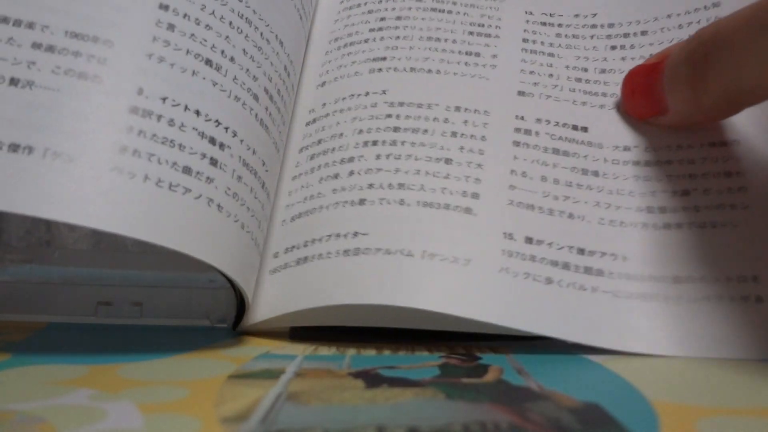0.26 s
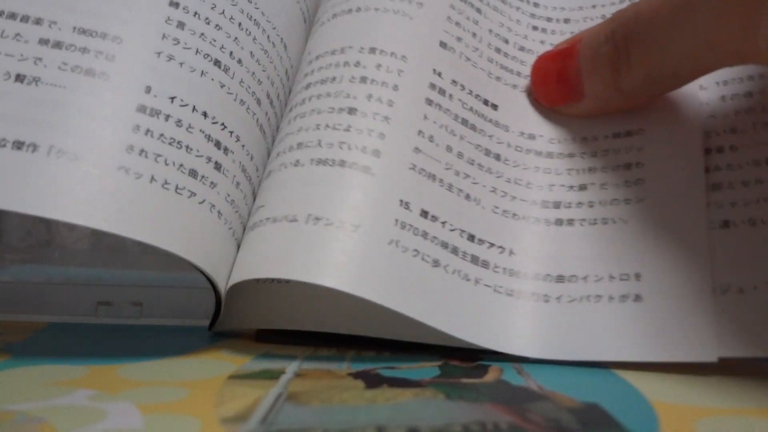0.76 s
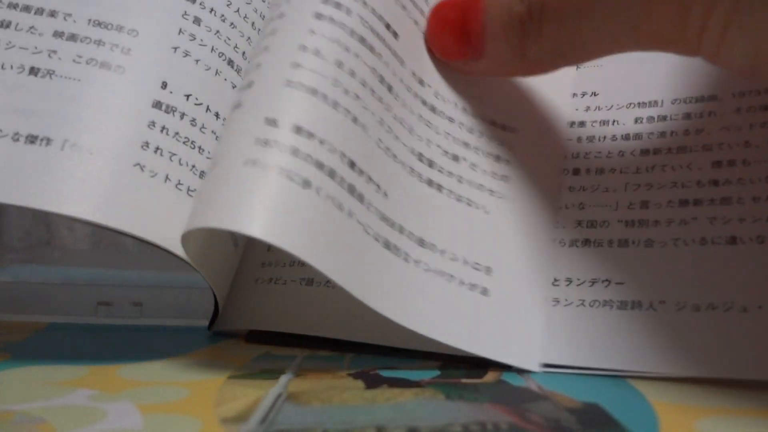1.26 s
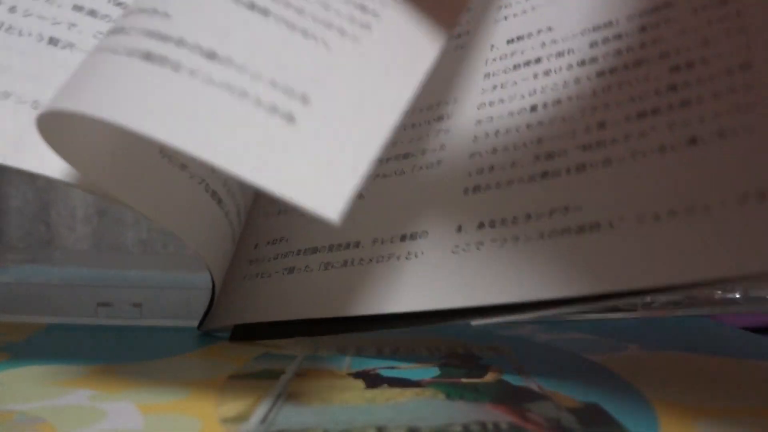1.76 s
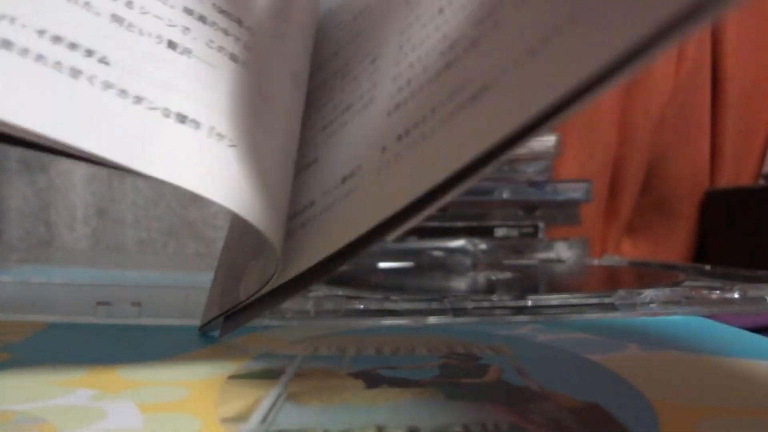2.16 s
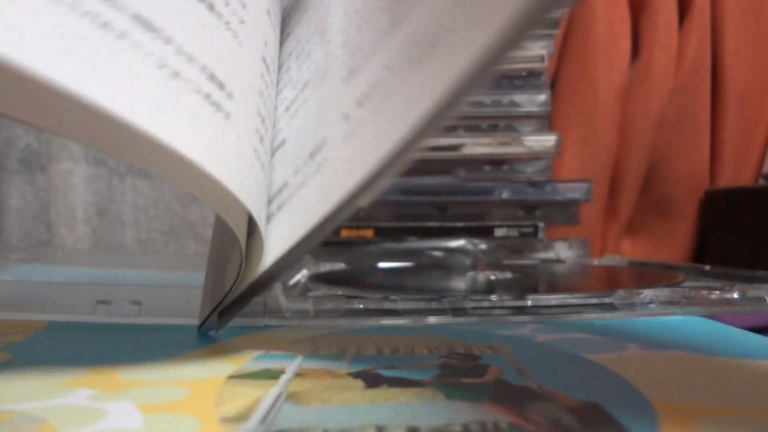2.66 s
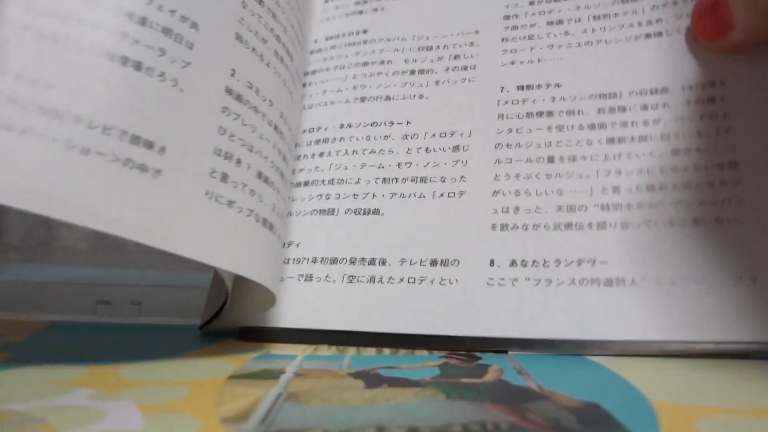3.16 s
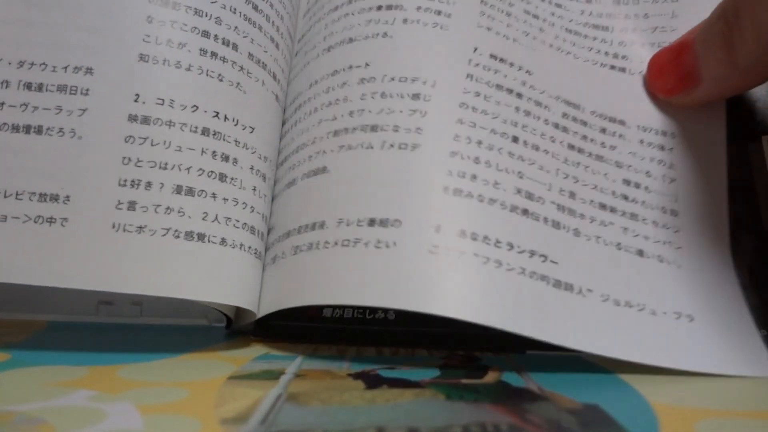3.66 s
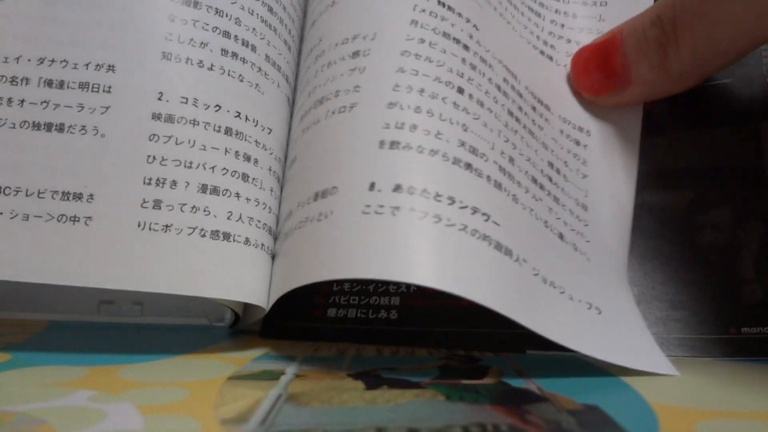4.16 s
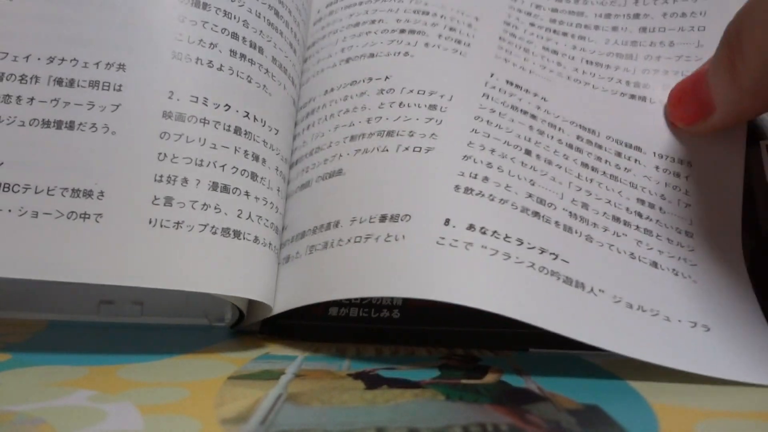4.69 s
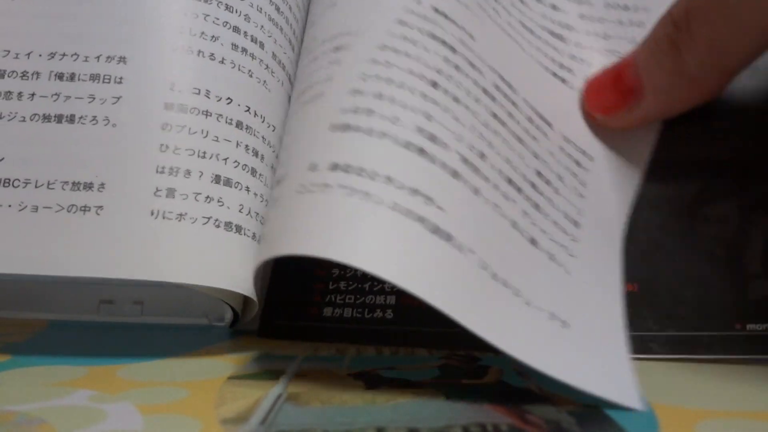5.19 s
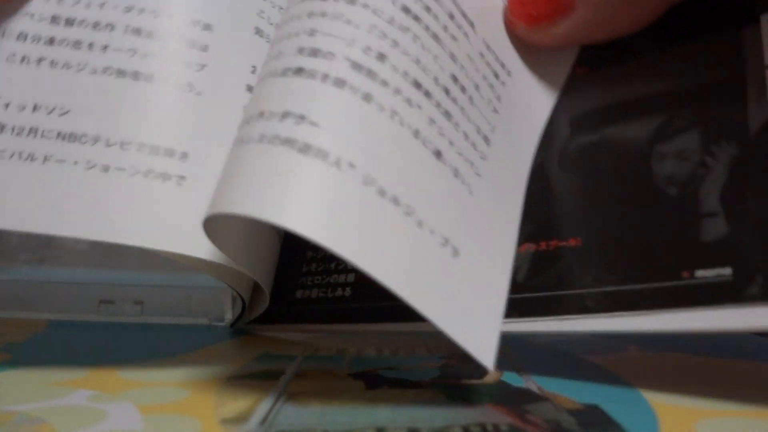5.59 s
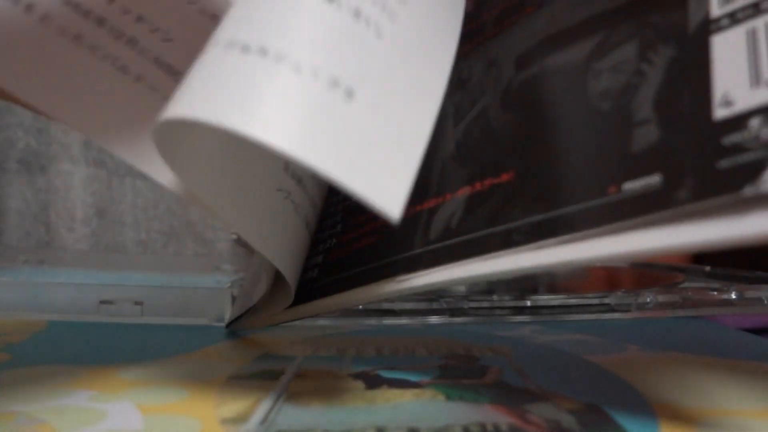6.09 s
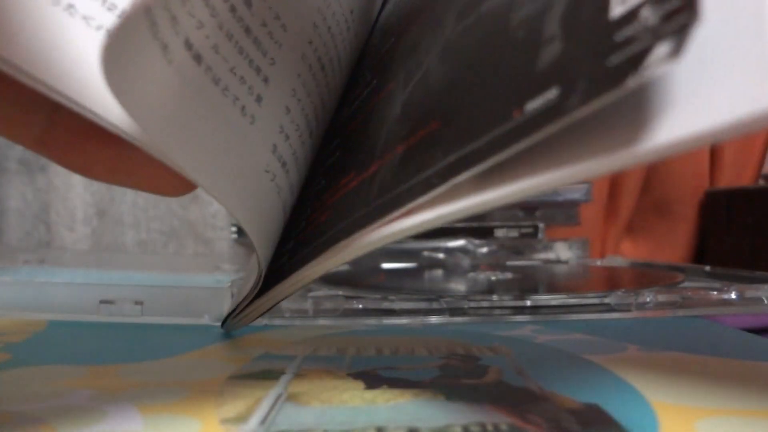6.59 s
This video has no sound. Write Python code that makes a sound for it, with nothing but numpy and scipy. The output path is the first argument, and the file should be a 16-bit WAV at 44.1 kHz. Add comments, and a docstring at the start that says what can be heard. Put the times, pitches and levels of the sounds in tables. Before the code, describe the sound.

Close stereo microphone in a small quiet room: a thumb rubs a thick page in soft, patchy hisses, then the page flips with a cluster of crisp ticks and hollow flutter. After a near-quiet gap come soft bumps, a sharper snap and a longer, stronger rub, ending with a quick bright swish. Faint hum and steady hiss lie underneath.

```python
"""Paper hisses in strokes and short slips as a thumb pushes the stiff pages of a booklet over,
close to a two-port microphone in a quiet room. The rubbing is dense clicks through sheet resonances;
the curl of the page rings hollow in lower ones. Creases tick as short noise bursts through both, and
the booklet bumps on the table as low noise. Short dull echoes, a low rumble, room noise, mains hum
and a thin steady hiss lie below."""
import sys
import numpy as np
from scipy import signal
from scipy.fft import rfft, irfft
from scipy.io import wavfile
from scipy.ndimage import map_coordinates

SR = 44100
rng = np.random.default_rng(int(sys.argv[2]) if len(sys.argv) > 2 else 0)


def waveform_to_disk(signal):
    """Save audio, clipped to [-1, 1], as 16-bit WAV at the path in sys.argv[1]."""
    frames = np.transpose(np.atleast_2d(signal))
    scaled = np.clip(frames, -1, 1) * 32767
    samples = np.round(scaled).astype(np.int16)
    wavfile.write(sys.argv[1], SR, samples)


N = 301644

# resonances of the sheet: (centre [Hz], width before widening [Hz], level before scaling [dB])
SHEET_MODES = [(2943, 535, 0.5), (3363, 945, -1.5), (4035, 720, 2.5), (5630, 850, -0.5), (7180, 790, 1.5),
               (8830, 2650, -1.5), (11050, 19000, -23.5)]
# resonances of the air wedge under the curl: (centre [Hz], width before widening [Hz], level before scaling [dB])
CURL_MODES = [(700, 182, -17.5), (938, 110, -15.5), (1395, 172, 1), (1620, 198, 4), (1755, 280, 3),
              (2540, 230, -3)]
# where the paper sounds: (time [s], left over right [dB])
PLACE = [(0.0, -2), (3.01, 4), (3.37, 0.5), (5.12, -0.5), (6.84, 3)]


def from_db(db):
    """Decibels to an amplitude factor."""
    return 10 ** (np.asarray(db) / 20)


def rms_one(x):
    """Scale to an rms of one."""
    return x / np.sqrt(np.mean(x ** 2) + 1e-20)


def at_times(rows, axis=1):
    """One column of a curve read at every sample."""
    return np.interp(np.arange(N) / SR, np.array(rows)[:, 0], np.array(rows)[:, axis])


def left_right(pan_db):
    """Gains of the two ports that share out a level difference."""
    return from_db([pan_db / 2, -pan_db / 2])


def drift(rate_hz):
    """Slow chance: twice low-passed noise, spread 1."""
    step = 40  # samples between slow values
    pole = np.exp(-2 * np.pi * rate_hz * step / SR)
    noise = rng.standard_normal(N // step + 2002)
    slow = signal.lfilter([1], [1, -2 * pole, pole * pole], noise)[2000:]  # settled part
    return np.interp(np.arange(N) / step, np.arange(len(slow)), rms_one(slow))


def resonate(x, hz, width_hz):
    """Two-pole resonance of gain 1 on top."""
    r = np.exp(-np.pi * width_hz / SR)
    feedback = [1, -2 * r * np.cos(2 * np.pi * hz / SR), r * r]
    return signal.lfilter([(1 - r * r) / 2, 0, (r * r - 1) / 2], feedback, x + 1e-18)


def moving_band(x, hz, width_hz, order):
    """A band whose centre moves: shift down, low-pass, shift back."""
    turn = np.exp(2j * np.pi * np.cumsum(hz) / SR)
    low_pass = signal.butter(order, width_hz / 2, fs=SR, output="sos")
    return (signal.sosfilt(low_pass, x / turn) * turn).real


def gliding(x, hz, width_hz):
    """A resonance that moves in pitch, at an rms of one."""
    return rms_one(moving_band(x, hz, width_hz, order=2))


def friction(per_s, spread_db):
    """Fibres catch and let go: dense clicks of uneven size."""
    sizes = from_db(spread_db * np.minimum(rng.exponential(1, N), 5)) * rng.standard_normal(N)
    return rms_one(sizes * (rng.random(N) < per_s / SR))


def sounding(modes, drive, patchy_db, tilt=0):
    """The bending sheet keeps changing which resonance speaks; steep skirts leave dark valleys."""
    pivot_hz, widening = 5500, 2.28  # tilt is in dB per octave about the pivot
    plain = []
    for k, (hz, width_hz, db) in enumerate(modes):
        once = resonate(drive, hz, widening * width_hz)
        twice = resonate(once, hz, widening * width_hz)
        plain.append((-1) ** k * from_db(db) * twice)
    total = 0
    for mode, (hz, _, _) in zip(plain, modes):
        wander_db = patchy_db * (drift(2.05) + 0.3 * drift(21.6))
        total = total + mode * from_db(wander_db + tilt * np.log2(hz / pivot_hz))
    return total / np.std(sum(plain))


def folded(x):
    """Short echoes off the folds of the page; their paths wander, so dips and peaks shift through the hiss."""
    fold_echo_s = [.00031, .00058, .00107]
    wander_share, fold_db = .05, -13  # wander is a share of each delay
    n, echo_sum = np.arange(N), 0
    for lag_s in fold_echo_s:
        delay = SR * lag_s * (1 + wander_share * drift(2.5))
        echo_sum = echo_sum + map_coordinates(x, [n - delay], order=3)
    return rms_one(x + from_db(fold_db) * echo_sum) * np.std(x)


def catches():
    """Fine ripple in dB: tension builds up slowly, then lets go at once."""
    catches_per_s, build_s, ripple_db = 90, 0.0078, 1.5  # ripple in dB per unit of swell
    marks = rng.exponential(1, N) * (rng.random(N) < catches_per_s / SR)
    # dying tails turned around in time become slow rises with sudden drops
    swell = signal.lfilter([1], [1, -np.exp(-1 / (build_s * SR))], marks + 1e-18)[::-1]
    return ripple_db * (np.minimum(swell, 2) - swell.mean())


def sticking():
    """The stroke sinks and recovers wherever the page sticks for a moment."""
    # page sticks: (centre [s], length [s], deepest drop [dB])
    sticks = [(4.04, 0.067, 6), (4.236, 0.066, 5), (5.165, 0.074, 5), (5.357, 0.061, 8.5),
              (5.634, 0.025, 14), (5.751, 0.012, 21)]
    t, drop_db = np.arange(N) / SR, 0
    for s, length, db in sticks:
        drop_db = drop_db + db * np.clip(1 - (2 * (t - s) / length) ** 2, 0, 1)
    return from_db(-drop_db)


def slips():
    """Power of short slips: each rises quickly to an arch, topped before the middle, and sinks further to its end."""
    # slips between two stickings: (start [s], length [s], hiss level at the top of the arch [dB])
    slip_list = [(0.165, 0.053, -42.5), (0.477, 0.053, -42), (0.772, 0.14, -38.5), (0.906, 0.066, -41),
                 (1.095, 0.055, -41), (1.191, 0.042, -41.5), (1.262, 0.07, -40), (1.325, 0.067, -42.5),
                 (1.39, 0.099, -46), (1.564, 0.065, -52), (1.642, 0.066, -46.5), (1.968, 0.045, -43),
                 (2.054, 0.033, -41), (2.222, 0.027, -43), (2.248, 0.039, -41.5), (2.631, 0.044, -49),
                 (2.751, 0.15, -56.5), (2.93, 0.05, -46), (2.999, 0.03, -50), (3.051, 0.047, -41.5),
                 (3.138, 0.062, -39), (3.215, 0.08, -42.5), (3.448, 0.016, -40), (3.674, 0.028, -33),
                 (4.052, 0.096, -40.5), (4.179, 0.053, -39.5), (4.267, 0.053, -35.5), (4.995, 0.037, -39.5),
                 (5.093, 0.044, -45.5), (5.19, 0.1, -40.5), (5.405, 0.051, -42), (5.589, 0.074, -38.5),
                 (5.657, 0.046, -35), (5.766, 0.043, -39.5), (5.835, 0.023, -33.5), (5.873, 0.045, -35.5),
                 (5.978, 0.031, -46), (6.004, 0.034, -39.5), (6.135, 0.053, -42)]
    rise_s, fall_s = 0.0067, 0.0062
    arch_db, peak_at = 7.5, 0.4  # drop half a length from the top; top as a share of the length
    t, power = np.arange(N) / SR, np.zeros(N)
    for s, length, db in slip_list:
        edges = np.clip(np.minimum((t - s) / rise_s, (s + length - t) / fall_s), 0, 1)
        from_top = np.clip(2 * ((t - s) / length - peak_at), -2, 2)
        power += (from_db(db - arch_db * from_top ** 2) * edges) ** 2
    return power


def sliding():
    """Paper on paper: hiss and hollow ring share strokes, slips and the jerks of the hand."""
    # how hard the page slides: (time [s], rubbing level before sticks, slips and jerks [dB])
    strokes = [(0.0, -52.5), (0.36, -48), (0.53, -45.5), (0.8, -43), (1.05, -42.5), (1.47, -55.5),
               (1.51, -60), (1.93, -72.5), (2.15, -56.5), (2.36, -62), (2.7, -68.5), (3.12, -59),
               (3.15, -51.5), (3.32, -43.5), (3.38, -52.5), (3.57, -38), (4.01, -34.5), (4.05, -46),
               (4.33, -34.5), (4.7, -36), (4.74, -46), (5.27, -38), (5.46, -53), (5.56, -56.5), (5.68, -40),
               (5.915, -38), (5.937, -27), (5.943, -51.5), (6.2, -58), (6.53, -50.5), (6.67, -63),
               (6.71, -52), (6.84, -52.5)]
    # how the curl rings: (time [s], hollow over hiss before a 3 dB cut [dB], pitch of its moving band [Hz])
    curling = [(0.0, -15, 1450), (0.25, -13, 1470), (0.36, 4, 1410), (0.44, 1, 1350), (0.48, 3, 1890),
               (0.6, -1.5, 1840), (0.75, -7, 1950), (.95, -3.5, 1830), (1.28, -11, 1830), (1.4, 1, 1250),
               (1.47, 0, 1540), (1.68, -12.5, 1610), (2.0, -6, 1580), (2.65, -4, 1900), (2.9, -18, 1480),
               (3.3, -15.5, 1480), (3.42, 6.5, 1930), (3.52, 5.5, 1570), (4.0, -2.5, 1370), (4.75, 0, 1470),
               (5.3, 3, 1454), (5.65, -9, 1460), (5.88, -11.5, 1730), (6.1, -3.5, 1700), (6.16, -2.5, 1970),
               (6.23, -12, 1740), (6.56, 0.5, 1860), (6.84, -5.5, 1670)]
    # hiss band that moves as the sheet bends: (time [s], level over hiss [dB], pitch [Hz])
    bending = [(0.0, -2, 3270), (0.19, -3.5, 4900), (0.3, -6, 4730), (0.33, -2, 3040), (0.6, -6, 3130),
               (0.63, -7, 4400), (0.85, -27, 4330), (1.3, -4.5, 4530), (1.36, -47, 3180), (2.27, -6, 4070),
               (3.3, -5.5, 4360), (3.45, -10.5, 4740), (3.7, -5.5, 3520), (4.05, -4.5, 4320),
               (4.3, -10.5, 3840), (4.9, -5.5, 3740), (5.4, -3.5, 4700), (5.8, -24, 4780), (6.3, -5, 5300),
               (6.84, -7.5, 5100)]
    plain_curl_db, dulling_per_db = -10.5, 0.3969  # more ring dulls the hiss: dB per octave for each dB
    plain_rub_db, brightening_per_db = -37.5, 0.0527  # harder rubbing is brighter: likewise
    bend_band_hz, curl_band_hz, curl_band_db = 770, 277, -3

    curl_db = at_times(curling)
    jerk = from_db(drift(4.8) + catches())
    stroke = sticking() * from_db(at_times(strokes))
    rub = jerk * np.sqrt(stroke ** 2 + slips())
    dulling = dulling_per_db * (plain_curl_db - curl_db)
    brightening = brightening_per_db * (20 * np.log10(rub) - plain_rub_db)

    fine, coarse = friction(14000, 0.14), friction(5000, 0.44)
    # the moving bands run on reversed clicks, to be unlike the fixed resonances
    bend = gliding(fine[::-1], at_times(bending, axis=2), bend_band_hz)
    sheet = folded(sounding(SHEET_MODES, fine, 1.0, dulling + brightening))
    sheet = sheet + from_db(at_times(bending)) * bend
    curl_band = gliding(coarse[::-1], at_times(curling, axis=2), curl_band_hz)
    hollow = sounding(CURL_MODES, coarse, 2.85) + from_db(curl_band_db) * curl_band
    return rub * (sheet + from_db(curl_db - 3.0) * hollow) * left_right(at_times(PLACE))


def combed(x):
    """Sound from the facing page partly cancels a narrow band, which moves with the gap; a second dip stays."""
    # moving dip: (time [s], pitch [Hz])
    facing = [(0, 2480), (.45, 3500), (1.3, 3700), (1.5, 2970), (2.1, 2880), (3.0, 2480), (3.55, 2800),
              (4.08, 3200), (4.25, 3050), (4.9, 3100), (5.45, 3770), (5.6, 3120), (6.1, 3140), (6.3, 2800),
              (6.84, 2920)]
    cancelled_share = 0.35
    for hz, width_hz in [(at_times(facing), 340), (np.full(N, 2260), 200)]:
        # a one-sided band holds half the amplitude, hence the 2
        x = x - 2 * cancelled_share * moving_band(x, hz, width_hz, order=1)
    return x


def echoes(x):
    """Nearby surfaces: a dull dying tail of noise, new at each call."""
    t60_s, wall_cut_hz = 0.26, 1860
    t = np.arange(int(.25 * SR)) / SR
    tail = rng.standard_normal(len(t)) * from_db(-60 * t / t60_s)
    tail = signal.sosfilt(signal.butter(1, wall_cut_hz, fs=SR, output="sos"), tail)
    return signal.fftconvolve(x, tail / np.linalg.norm(tail))[:N]


def room_tone():
    """Diffuse shaped noise, nearly independent in the two ports, with wavering mains partials alike in both."""
    # spectrum of the room: (frequency [Hz], relative density [dB])
    room_curve = [(18, -71), (30, -31), (92, -16), (299, -13), (479, -7.5), (656, -5), (897, -6),
                  (1440, -11.5), (2300, -13), (4400, -26), (8000, -23), (15500, -51)]
    # mains partials: (frequency [Hz], rms level about which it wavers [dB])
    hum_partials = [(100, -82.5), (300, -84), (400, -77.5)]
    room_db = -62.5  # rms of the part alike in both ports
    curve = np.array(room_curve)
    hz = np.maximum(np.fft.rfftfreq(N, 1 / SR), 1)
    shape = from_db(np.interp(np.log(hz), np.log(curve[:, 0]), curve[:, 1]))
    mid, side = rms_one(irfft(rfft(rng.standard_normal((2, N))) * shape, N))
    t, hum = np.arange(N) / SR, 0
    for f, db in hum_partials:
        hum = hum + np.sqrt(2) * from_db(db + 2.5 * drift(3)) * np.sin(2 * np.pi * f * t)
    return from_db(room_db) * (mid + from_db(-0.5) * side * [[1], [-1]]) + hum


def faint_hiss():
    """A narrow band of noise that wavers slowly, alike in both ports."""
    low_hz, high_hz, level_db = 5200, 6930, -67.5
    band = signal.butter(3, [low_hz, high_hz], "band", fs=SR, output="sos")
    noise = rms_one(signal.sosfilt(band, rng.standard_normal(N)))
    return from_db(level_db + 0.26 * drift(4.8)) * noise


def bumps():
    """Pushes shake the table in short lumpy bursts, uneven in the two ports; a faint low rumble wavers throughout."""
    # soft bumps through the table: (start [s], peak of the envelope [dB])
    bump_list = [(0.009, -48.5), (0.127, -57.5), (1.003, -54), (2.201, -66), (3.031, -51), (3.085, -50),
                 (3.266, -57), (3.306, -50.5), (3.329, -53), (4.345, -52.5), (5.697, -54), (6.527, -47.5),
                 (6.779, -57)]
    rise_s, t60_s = 0.0027, 0.13
    table_low_hz, table_high_hz, rumble_db = 60.5, 198, -81
    t, push = np.arange(SR // 4) / SR, np.zeros(N + SR)
    swell = (1 - np.exp(-t / rise_s)) * from_db(-60 * t / t60_s)
    for s, db in bump_list:
        start = round(s * SR)
        push[start:start + len(t)] += from_db(db) * swell / swell.max()
    table = signal.butter(2, [table_low_hz, table_high_hz], "band", fs=SR, output="sos")
    mid, side = rms_one(signal.sosfilt(table, rng.standard_normal((2, N))))
    low_band = signal.butter(2, [40, 110], "band", fs=SR, output="sos")
    rumble_noise = rms_one(signal.sosfilt(low_band, rng.standard_normal(N)))
    rumble = from_db(rumble_db + 4.2 * drift(0.92)) * rumble_noise
    return push[:N] * (mid + from_db(-3.5) * side * [[1], [-1]]) + rumble


def ticks():
    """A crease snaps as a short burst that sets sheet, curl and booklet sounding, each mode with its own strength."""
    # creases giving way: (start [s], crack peak [dB], hollow peak [dB], dull knock peak [dB])
    creases = [(0.061, -34, -62, -52), (0.35, -24, -35.5, -41.5), (1.865, -60, -53, -40.5),
               (2.0665, -23, -19.5, -37.5), (2.1136, -33, -44, -47), (2.126, -40, -51, -59),
               (2.143, -38, -44, -48), (2.163, -27, -31.5, -39), (2.23, -31, -31.5, -29.5),
               (2.321, -32, -54, -63), (2.3303, -32, -44.5, -48), (2.472, -43.5, -57, -65),
               (2.648, -36, -37.5, -33.5), (2.732, -46, -55, -68), (3.293, -28, -34.5, -25.5),
               (3.31, -47, -40, -33), (3.324, -30, -42, -33), (3.407, -46, -59, -32.5),
               (3.4273, -37, -58, -38), (3.677, -21, -20.5, -31.5), (5.664, -30, -33, -34),
               (5.9339, -26, -27, -36.5)]
    # the knocked booklet: (centre [Hz], width before widening [Hz], level before scaling [dB])
    knock_modes = [(306, 190, 2.5), (697, 374, 10.5), (960, 610, 1.5), (2700, 940, -2.5)]
    crack_rise_s, crack_fall_s = 0.00019, 0.0031
    ring_rise_s, ring_fall_s = 0.0013, 0.0031
    t, out = np.arange(int(.04 * SR)) / SR, np.zeros((2, N))
    noise = rng.standard_normal((len(creases), len(t)))
    crack = noise * (1 - np.exp(-t / crack_rise_s)) * np.exp(-t / crack_fall_s)
    swell = noise * (1 - np.exp(-t / ring_rise_s)) * np.exp(-t / ring_fall_s)
    snap = 0
    # the highest curl resonance stays silent here
    parts = [(SHEET_MODES, crack), (CURL_MODES[:-1], swell), (knock_modes, swell)]
    for column, (modes, bursts) in enumerate(parts, start=1):
        strength_db = rng.normal(0, 2, (len(creases), len(modes)))
        ring = 0
        for k, (hz, width_hz, db) in enumerate(modes):
            twice = resonate(resonate(bursts, hz, 2 * width_hz), hz, 2 * width_hz)
            ring = ring + (-1) ** k * from_db(db + strength_db[:, [k]]) * twice
        peak = np.abs(ring).max(axis=1, keepdims=True)
        snap = snap + from_db(np.array(creases)[:, [column]]) * ring / peak
    for (s, *_), sound in zip(creases, snap):
        pan_db = np.interp(s, *np.transpose(PLACE))
        start = round(s * SR)
        out[:, start:start + len(t)] += left_right(pan_db)[:, None] * sound
    return out


def scene():
    """Paper and its echoes, partly alike and partly opposite in the two ports, over table and room."""
    paper = combed(sliding()) + ticks()
    near = paper.mean(axis=0)
    alike = from_db(-20.5) * echoes(near)
    opposite = from_db(-19.0) * echoes(near) * [[1], [-1]]
    return paper + alike + opposite + bumps() + room_tone() + faint_hiss()


def record(dry):
    """The top is cut steeply: 60 dB down from 15.9 kHz upward."""
    return signal.sosfilt(signal.cheby2(14, 60, 15900, fs=SR, output="sos"), dry)


dry = scene()
out = record(dry)
waveform_to_disk(out)
```